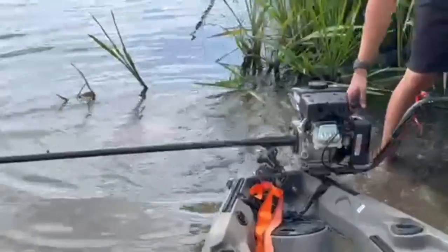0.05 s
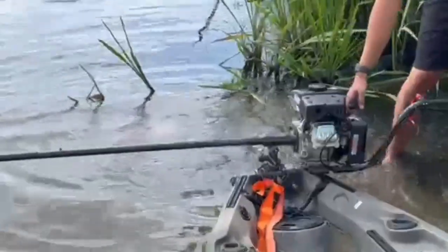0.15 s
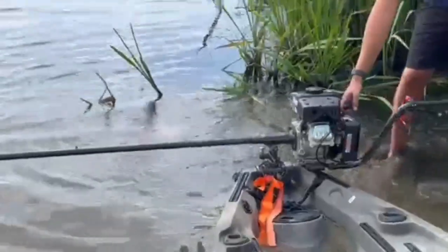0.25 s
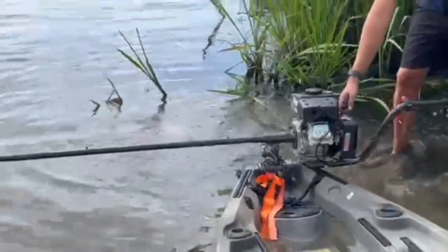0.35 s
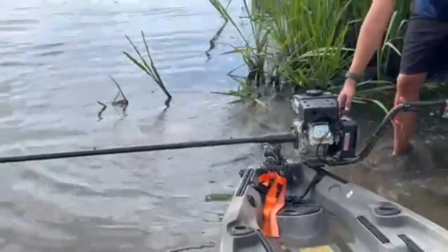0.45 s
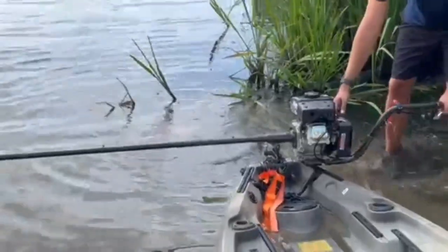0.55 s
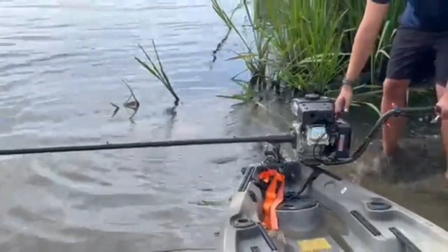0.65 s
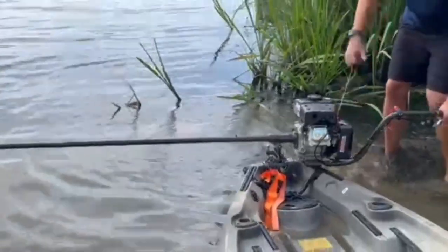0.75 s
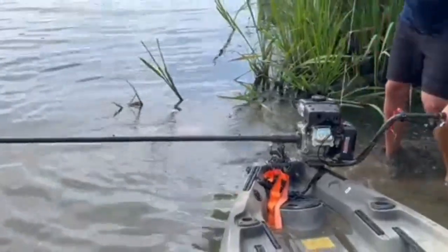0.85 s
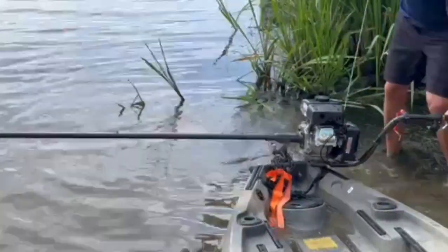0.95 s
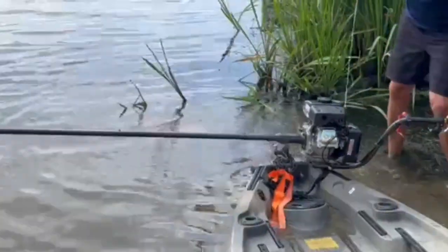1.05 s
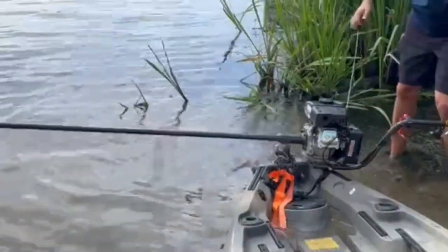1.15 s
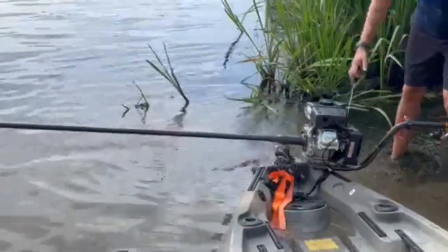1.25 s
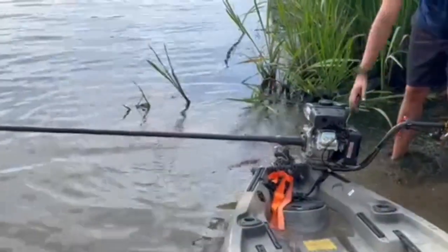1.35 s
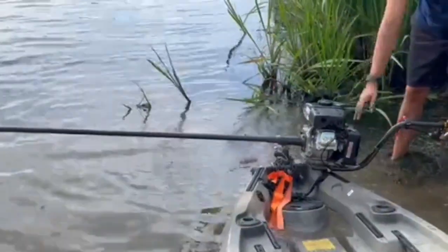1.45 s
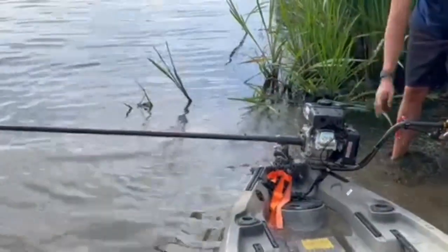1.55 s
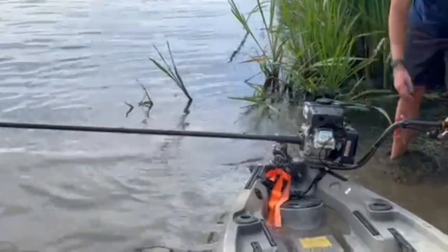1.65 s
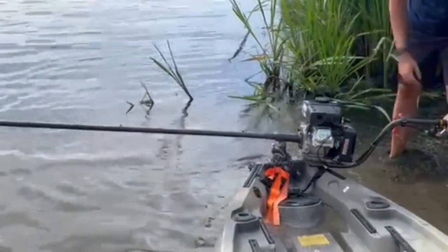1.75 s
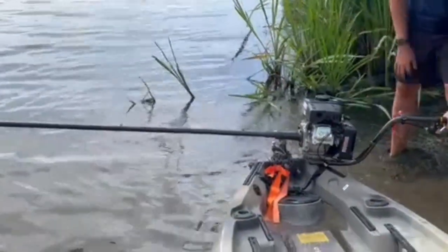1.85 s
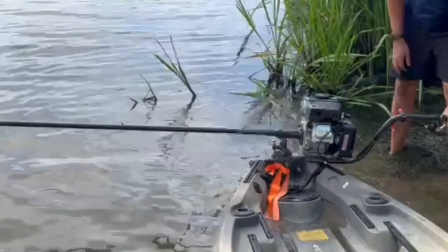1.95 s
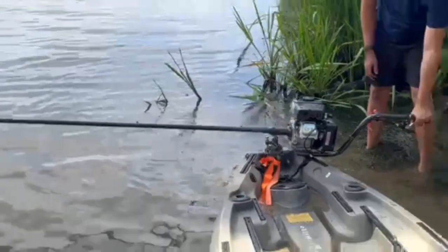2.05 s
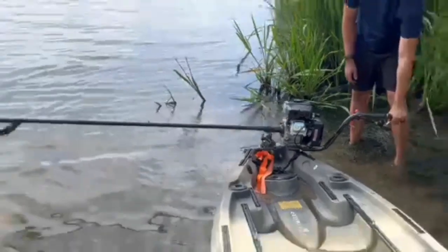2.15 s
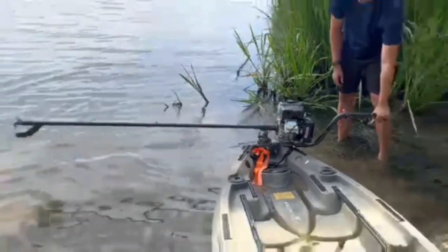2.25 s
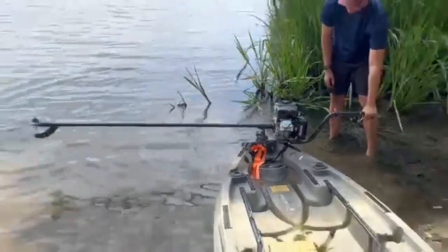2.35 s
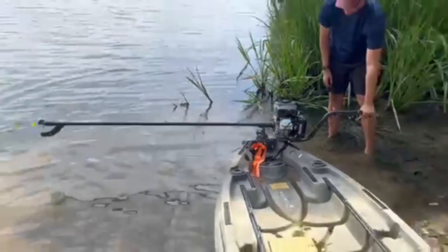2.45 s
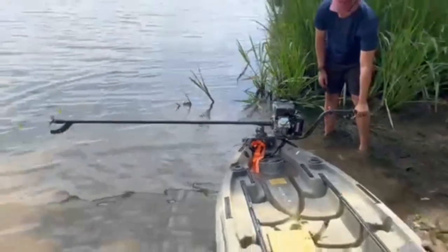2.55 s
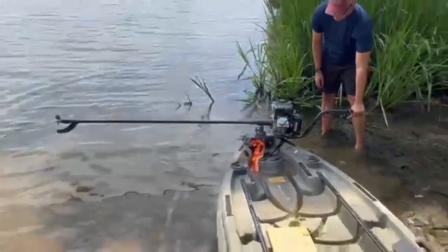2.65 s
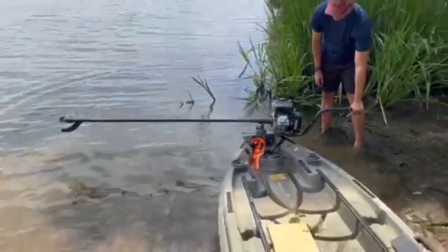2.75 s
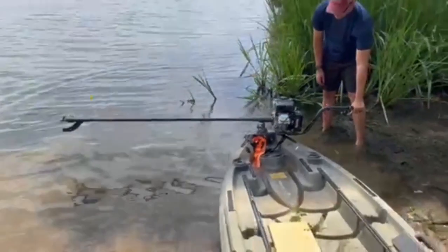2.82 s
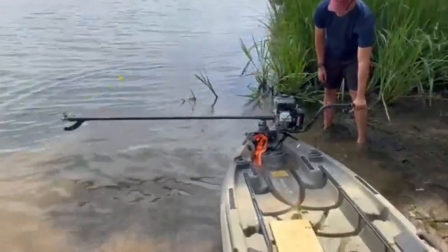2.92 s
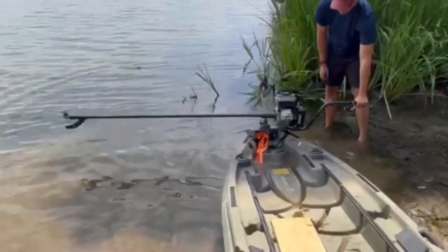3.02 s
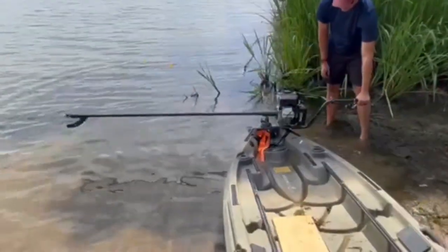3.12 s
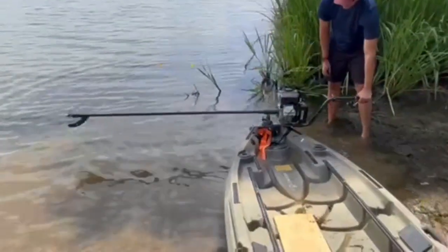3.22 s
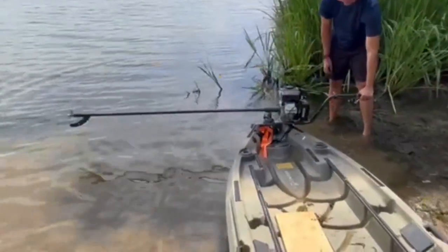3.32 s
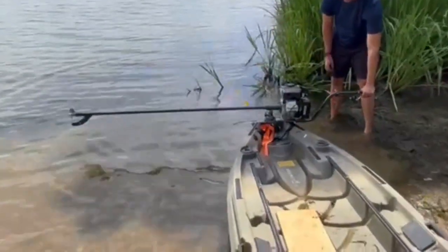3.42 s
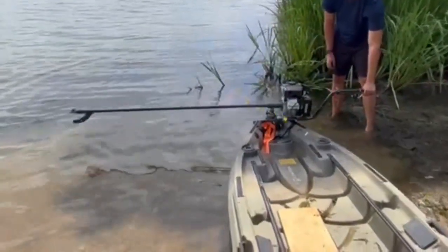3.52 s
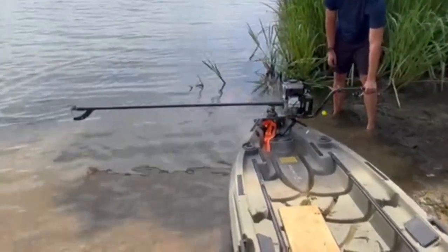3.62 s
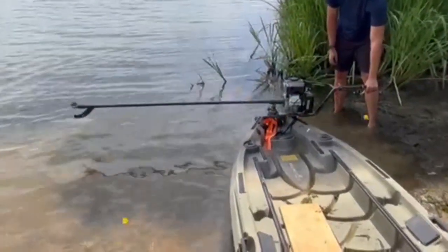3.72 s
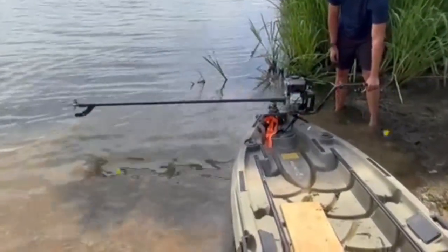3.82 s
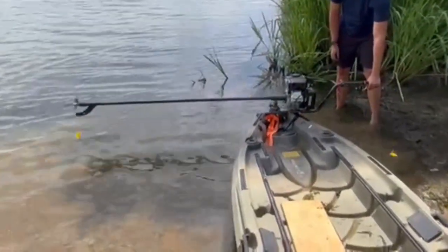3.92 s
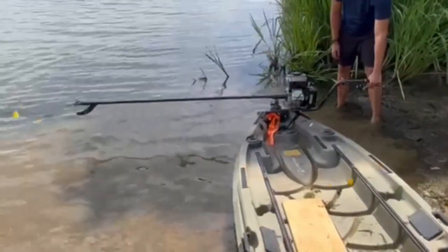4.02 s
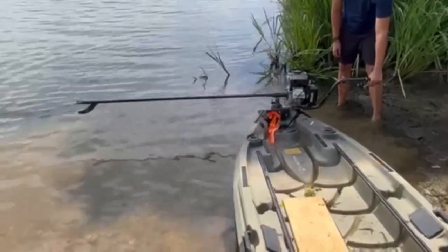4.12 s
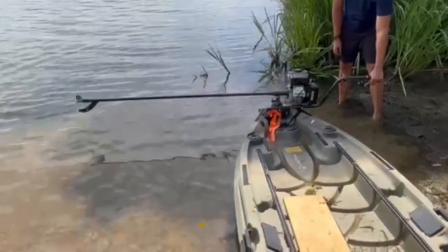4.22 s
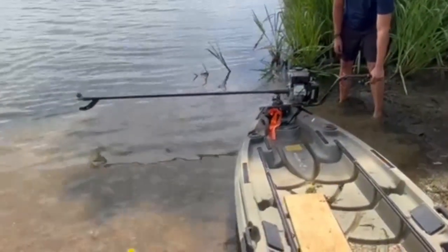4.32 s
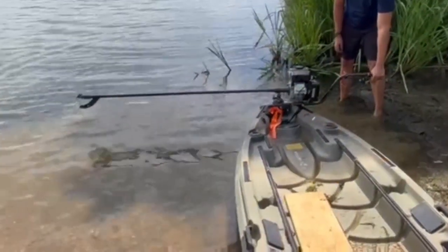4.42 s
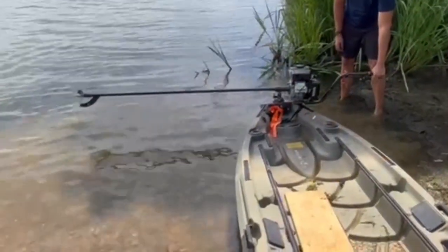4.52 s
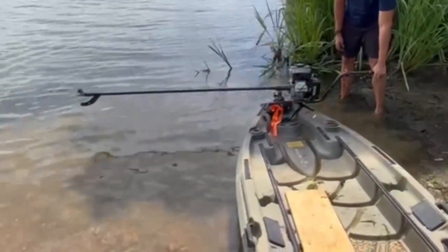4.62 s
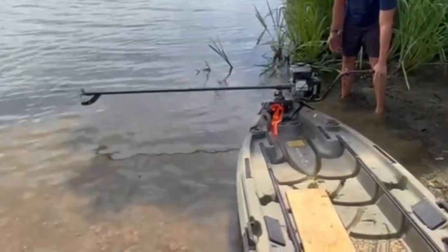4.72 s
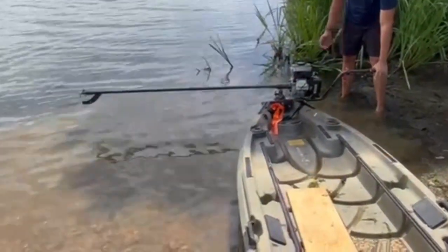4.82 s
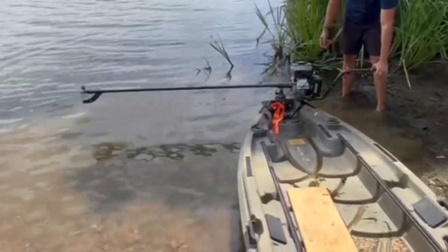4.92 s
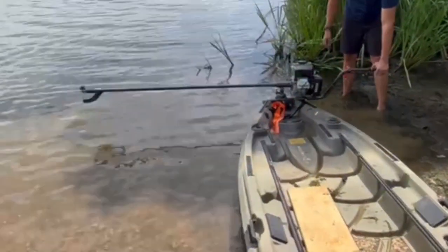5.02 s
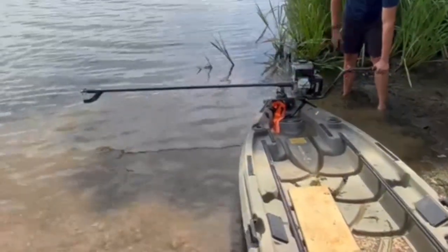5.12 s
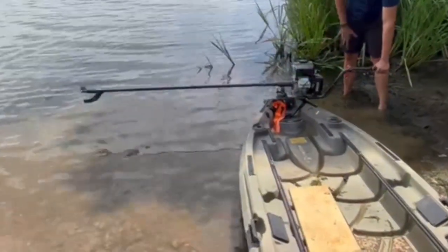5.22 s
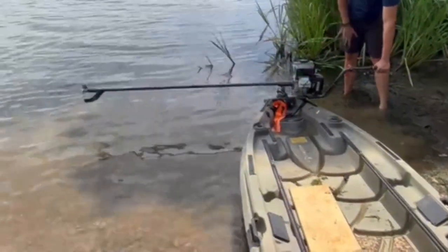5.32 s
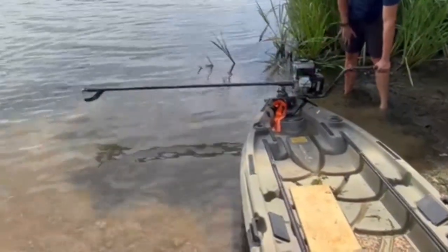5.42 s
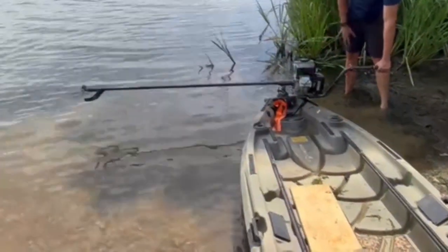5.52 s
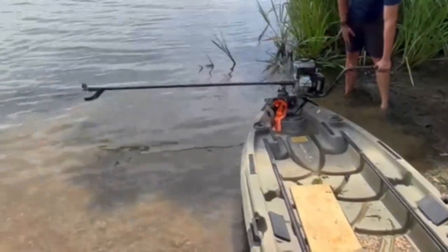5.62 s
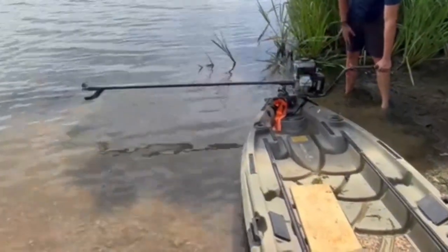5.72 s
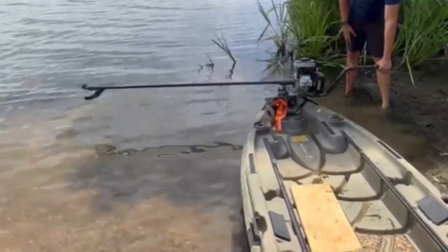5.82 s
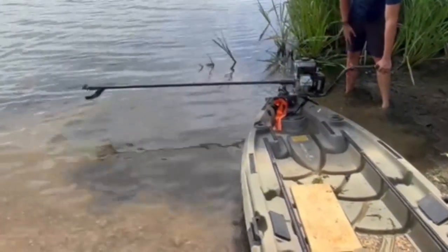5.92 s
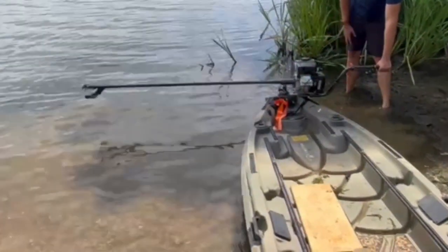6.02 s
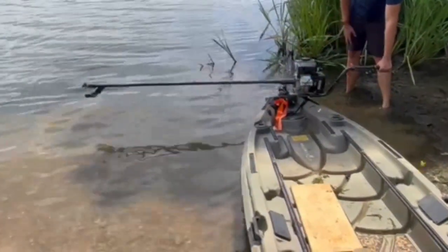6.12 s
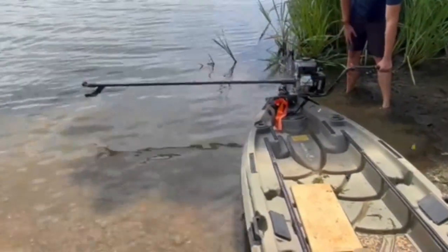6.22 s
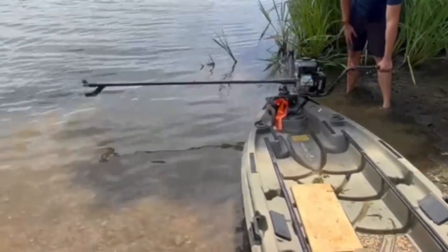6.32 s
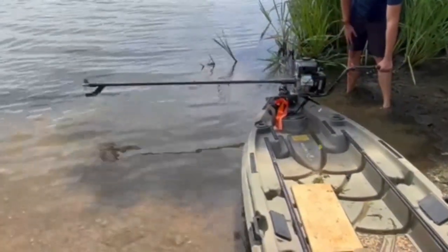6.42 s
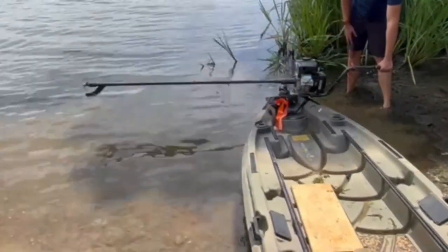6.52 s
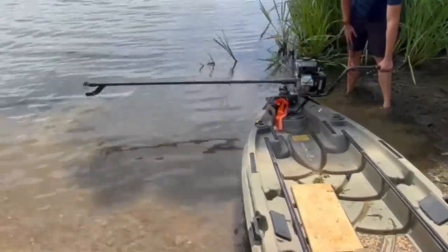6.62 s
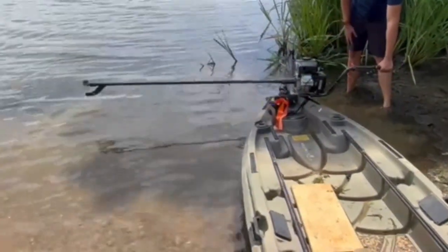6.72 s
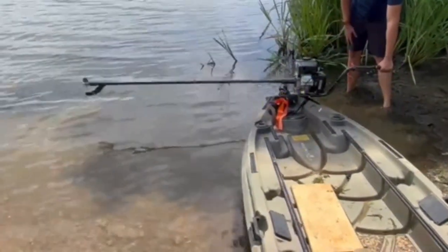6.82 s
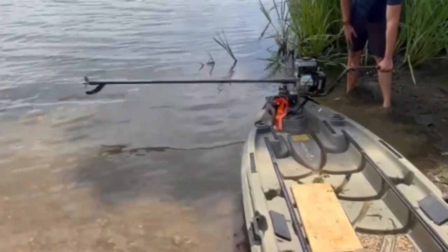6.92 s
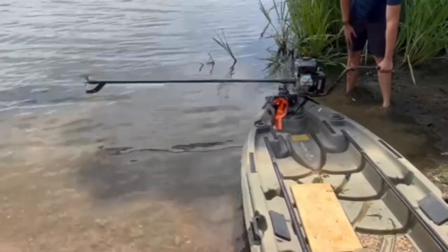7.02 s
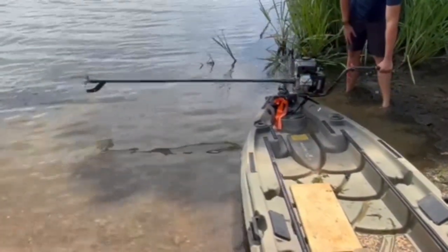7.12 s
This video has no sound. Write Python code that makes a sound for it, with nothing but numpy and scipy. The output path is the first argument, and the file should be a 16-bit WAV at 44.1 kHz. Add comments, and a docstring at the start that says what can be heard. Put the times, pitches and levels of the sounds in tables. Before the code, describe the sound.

Water laps quietly, a starter rope rasps, and a small single-cylinder engine barks up to a fast roar, then sinks to a thudding idle.

```python
"""Water laps at the bank and the starter handle ticks; then the rope rasps and a kayak's mud motor is
pull-started in the shallows. The single cylinder puffs, catches, barks up to speed, runs fast for two
seconds and sinks back to a thudding idle. Impulses and noise bursts timed by the engine cycle ring the
exhaust, block and hull; speed and throttle set their levels. Bubbles and filtered noise make the water.
A hand-held stereo microphone is a few metres away and draws back once the engine runs."""
import sys
import numpy as np
from scipy import signal
from scipy.fft import rfft, irfft, next_fast_len
from scipy.io import wavfile

SR = 44100
rng = np.random.default_rng(int(sys.argv[2]) if len(sys.argv) > 2 else 0)


def digitize_waveform(pressure):
    """Quantize a signal to 16-bit integers and store it at the path in sys.argv[1].

    Rows of a 2-D input are taken as channels; values are limited to [-1, 1].
    """
    field = np.atleast_2d(pressure).T
    bounded = np.clip(field, -1, 1)
    quanta = np.round(bounded * 32767).astype(np.int16)
    wavfile.write(sys.argv[1], SR, quanta)


N = 315756

# Water at the bank. Trickle: [t/s, level/dB]
TRICKLE = [(0, -56.5), (.15, -51), (.3, -56.5), (.45, -61.5), (.65, -57)]
# Small laps: [t/s, relative level/dB, starting pitch f/Hz, ring decay/s]
LAPS = [(0.076, -37, 1330, .006), (0.09, -28.5, 980, 0.0058), (0.103, -23.5, 1470, 0.0066),
        (0.126, -31, 1330, .007), (0.155, -37, 810, .02), (0.167, -40, 1140, 0.037),
        (0.181, -39, 730, 0.033), (.183, -32, 1500, .012), (0.26, -38, 1230, .008),
        (.283, -33, 1290, 0.0071), (0.517, -36, 1270, .005), (0.562, -39, 850, .008)]
# Spectrum of the hush along the shore: [f/Hz, relative level/dB]
SHORE = [(20, -7), (50, 14), (115, 4.5), (220, -2), (450, -10.5), (1100, -30), (3000, -30), (5500, -30),
         (8000, -22.5), (15800, -17.5)]

# Ticks of the starter as the handle is taken up and the pawls slip: [t/s, relative level/dB]
TICKS = [(0.052, -37), (0.12, -41), (.155, -38), (.299, -54), (.319, -45), (.412, -42), (.56, -43),
         (.892, -19), (.982, -10.5)]
# Spectrum of those ticks: [f/Hz, relative level/dB]
TICK_TONE = [(600, -15), (1700, -4.5), (4500, 0), (9000, -7), (15800, -16)]

# Pawls scraping in surges, each with a squeak:
# [t/s, held/s, level/dB, squeak f/Hz, squeak level re scrape/dB]
SCRAPES = [(0.679, 0.0095, -22, 1670, -5), (0.802, 0.017, -28, 1080, 2), (0.852, 0.039, -28.5, 1500, -13),
           (0.918, 0.026, -14.5, 8400, -16)]
SCRAPE_RISE_S, SCRAPE_TAIL = 0.0083, 1.42  # tail: decay time over held time
SQUEAK_WIDTH_HZ = 160
# Spectrum of rope and pawls: [f/Hz, relative level/dB]
STARTER = [(100, 7), (600, -4.5), (850, -1.5), (1150, 4), (1700, 8), (2600, -0.5), (4000, -4.5), (5200, -1),
           (7000, -10), (9500, -8), (12000, -16.5), (15800, -19)]
# Modes of the starter housing: [f/Hz, width/Hz, relative level/dB]
HOUSING = [(225, 25, -3.5), (486, 32, -9.5), (743, 27, -5.5)]
# Compression puffs while cranking: [t/s, relative level/dB]; the largest gives the peak level
PUFFS = [(.787, -18.5), (0.899, -9), (0.988, -7.5)]
PULL_FROM, TUG_AT, PULL_UNTIL = .642, .681, 1.0  # s: the rope starts to run, goes taut, is let go
ROPE_DB = -38.5
JOLT_DB, JOLT_RISE_S, JOLT_DECAY_S = -27.5, 0.0099, 0.046

# Engine speed: [t/s, firings per s]
SPEED = [(1.058, 14.98), (1.27, 23.036), (1.5, 36.403), (1.62, 39.291), (1.74, 38.533), (1.88, 36.157),
         (2.05, 37.624), (2.18, 36.961), (2.4, 36.66), (2.7, 36.79), (3.0, 36.588), (3.35, 37.459),
         (3.53, 35.07), (3.8, 31.323), (4.09, 27.028), (4.56, 22.304), (4.89, 19.447), (5.25, 18.259),
         (5.5, 18.348), (5.76, 16.979), (6.36, 18.101), (6.87, 17.982), (7.16, 17.168)]
FIRST_FIRING = 1.0583  # s
FAST_RATE = 37  # firings per s: the reference speed for the levels below
CATCH_AT, CATCH_LENGTH = .93, .1  # s: the engine fades in as it catches
BACK_FROM, BACK_LENGTH, NEAR_DB = 1.95, .5, 1.5  # s, s, dB: the microphone is carried back; louder before
FIRM_FROM, FIRM_LENGTH, FIRM_DB = 4.9, 1.3, 2.5  # s, s, dB: the idle slowly firms up
# Firings that stand out: [t/s, thump gain/dB, crack gain/dB]
UNEVEN = [(1.058, -6, -3.5), (1.119, 10.5, -3.5), (1.174, 10, -3), (1.223, -3, -0.5), (1.31, 5, -1),
          (1.475, -1, 0), (1.503, -15, -4), (1.61, 3, 2.5), (1.82, -9, 8), (1.928, 0.5, -0.5),
          (1.954, 4.5, -3.5), (1.981, 2, -2), (2.035, 4.5, -1), (2.061, 2, 2), (3.53, 0, 5),
          (3.832, 1, -11), (4.04, -2.5, 0), (4.305, 2.5, -2), (4.51, -6, 0), (4.65, -7, 0), (4.79, -7, 0)]

# Throttle: [opens t/s, shuts t/s, opening re wide open/dB, starting rasp level/dB]
THROTTLE = [(0.946, 1.571, 0.5, -26.5), (1.907, 1.997, -1.5, -30), (2.2, 2.543, -21, -29),
            (2.568, 3.4, -19, -27)]
OPEN_S, SHUT_S = 0.049, 0.043  # travel time, decay time
RASP_SAG_DB_PER_S = 7.5  # the rasp loses level from the moment the throttle opens

# Level of each part:
# [level at the reference speed/dB, dB per doubling of speed, dB added per unit of throttle opening]
THUD_LEVEL = (-21.5, 8.8, -8)
HISS_LEVEL = (-58.5, -1.5, 0)
CLATTER_LEVEL = (-27.5, 6.36, 1)
COVER_LEVEL = (-36.5, 5, 0.67)
VALVE_LEVEL = (-39, 6.85, 3.1)
HULL_LEVEL = (-32.5, 3.6, 14)
HUM_DB, HUM_OPEN_DB = -31, 6  # at the reference speed; added per unit of throttle opening

# Spectrum of air roaring through the carburettor: [f/Hz, relative level/dB]
ROAR = [(300, -34), (700, -9.5), (950, 15), (1400, 10), (1750, 1), (2200, -12), (2900, -1), (4000, -4),
        (5500, -3), (7000, -23), (12000, -18)]
ROAR_DB, ROAR_OPEN_DB, ROAR_DB_PER_OCTAVE = -30.5, 4, 2.5

# Blows of the mechanism in every cycle: [share of the cycle after firing, relative level/dB]
KNOCKS = [(-.14, 3), (-.07, 1.5), (.10, 5), (.25, 1), (.31, -0.5), (.42, -4.5), (.52, 3), (.74, -0.5)]
# Modes of the engine block: [f/Hz, width/Hz, relative level/dB]
BLOCK = [(730, 220, -18.5), (1119, 86, 3), (1310, 93, -0.5), (1620, 170, -12.5)]
# Spectrum of the casing: [f/Hz, relative level/dB]
CASING = [(150, -34), (450, -4.5), (700, -14.5), (1000, -10.5), (1500, -12), (2000, -14.5), (3400, -35),
          (9000, -59)]
# Modes of the tin covers over valves and fan: [f/Hz, width/Hz, relative level/dB]
COVERS = [(1705, 41, 2.5), (2011, 27, 2), (2298, 122, 0), (2542, 24, 3.5), (2660, 30, 3), (3075, 66, -2),
          (3235, 38, 5.5), (3336, 20, 7)]
# Spectrum of the valve gear: [f/Hz, relative level/dB]
VALVES = [(1500, -10.5), (3000, 7), (3700, 3), (4500, 8), (5400, 8.5), (6000, 2.5), (6700, -17),
          (7150, 10.5), (7800, 4.5), (8500, 2.5), (10500, -2.5), (15800, -49)]

# Modes of the silencer can and tailpipe: [f/Hz, width/Hz, relative level/dB]
PIPE = [(538, 61, -3), (730, 95, -8), (807, 6.2, 5.5), (883, 36, 7), (980, 60, 2.5), (1165, 33, 6.5),
        (1277, 20, 7), (1606, 24, 5), (2200, 60, -2)]
# Spectrum of the muffler's thud: [f/Hz, relative level/dB]
MUFFLER = [(20, -51), (60, -29), (100, 2.5), (160, -2.5), (220, 6.5), (330, 6), (420, 2.5), (475, -24.5),
           (650, -49), (950, -6.5), (1500, -21.5), (4000, -69)]
# Spectrum of the exhaust jet: [f/Hz, relative level/dB]
RASP = [(400, -36), (900, 2), (1600, 0), (2000, -1), (2550, 1.5), (3000, -13), (3700, -30), (6000, -19),
        (16000, -28)]
# Intake gulp after the exhaust; its lag is a time plus a share of the cycle
GULP_DB, GULP_LAG_S, GULP_SHARE, GULP_TOP_HZ = -8, 0.00582, 0.187, 300
# Modes of the plastic hull: [f/Hz, width/Hz, relative level/dB]
HULL = [(75, 40.7, 7), (102.9, 21, 12.5), (154.6, 70, 4.5)]
PATH_TOP_HZ = 2200  # soft and air-filled bodies pass little above this

# Spectrum of the crack as the valve lifts under load: [f/Hz, relative level/dB]
BLAST = [(60, -25), (200, 5), (450, 9), (680, -6), (1000, 5.5), (1500, 8.5), (2200, -2), (2550, 1),
         (3000, 0.5), (4000, -5.5), (5000, -2.5), (6300, 3), (8300, -6), (9200, -10.5), (15800, -15)]
# Spectrum of the slug of gas that follows: [f/Hz, relative level/dB]
SLUG = [(30, -27), (75, 0), (130, 12), (220, 0.5), (350, 4), (500, -3.5), (700, -27), (3000, -54)]
SLUG_DB, SLUG_LAG_S = -1, 0.00023
BARK_DB, BARK_DB_PER_OCTAVE = -21.5, 0.5
LEAK_DB, LEAK_DB_PER_OCTAVE = -24.5, 35  # share of the bark that does not need the throttle

# Coasting with the throttle shut while the exhaust booms: [from t/s, until t/s,
# boom level at the reference speed/dB, multiple of the firing rate, extra crank hum/dB]
COASTS = [(1.628, 1.814, -26, 4, 8), (2.084, 2.17, -27, 4, 8), (3.531, 3.93, -29.5, 3, 2),
          (3.97, 4.407, -37, 4, 10.5)]
COAST_FADE_S, COAST_THUD_DB, COAST_DB_PER_OCTAVE = 0.021, -7, 3
# Spectrum of uneven gas flow while coasting: [f/Hz, relative level/dB]
SPUTTER = [(30, -15), (70, -6.5), (105, 4.5), (170, -12.5), (270, -2), (400, -10), (600, -14), (3000, -72)]
SPUTTER_DB, BOOM_WAVER = 0.5, 0.32  # level re boom; rms share of the boom's gain that wavers

# Sound scattered by water and reeds: [f/Hz, level re direct sound/dB]
SCATTER = [(100, -23), (400, -23), (1000, -13), (2500, -9), (4500, -7), (7500, -9), (9000, -11)]
# Microphone pair, phase by which left leads right: [f/Hz, phase/rad]
LEAD = [(200, -.05), (1000, -.35), (1300, -.35), (1640, -1.5), (2550, -.3), (3300, .3), (4500, .6),
        (5300, 1.3), (6500, 2.9), (7100, 1.6), (8300, 0), (10300, 0), (11700, -2.9), (13700, -3),
        (14700, 0)]
# Microphone pair, left minus right: [f/Hz, level/dB]
TILT = [(300, -1.4), (800, -2.5), (1080, -6), (1400, -1), (1750, -4), (2200, .8), (2700, 0), (3200, -3.5),
        (4500, 0), (5500, 2), (7500, -2.5), (8400, 0)]
TOP_HZ = 15900  # upper band limit


def amp(db):
    """Decibels to gain."""
    return 10 ** (np.asarray(db) / 20)


def unit(x):
    """Scale to rms 1."""
    return x / np.sqrt(np.mean(x ** 2) + 1e-20)


def clock():
    """Time of each sample in seconds."""
    return np.arange(N) / SR


def curves(rows):
    """One value per sample for each column after the time."""
    s, *cols = np.transpose(rows)
    return [np.interp(clock(), s, c) for c in cols]


def along(points, hz):
    """Interpolate (Hz, value) points on a log frequency axis."""
    f, v = np.transpose(points)
    return np.interp(np.log(hz + 1), np.log(f + 1), v)


def ramp(start, length):
    """Rises from 0 to 1 over the given time."""
    return np.clip((clock() - start) / max(length, 1e-4), 0, 1)


def gate(start, end, attack, release):
    """Straight attack from the start, hold until the end, exponential release."""
    return ramp(start, attack) * np.exp(-np.maximum(clock() - end, 0) / release)


def filtered(x, response):
    """Pass x through a complex response of frequency."""
    m = 2 * next_fast_len(N // 2 + SR // 4)  # padded, so that tails do not wrap round
    return irfft(rfft(x, m) * response(np.fft.rfftfreq(m, 1 / SR)), m)[..., :N]


def colour(points):
    """Causal (minimum-phase) response with the given spectrum."""
    def response(hz):
        cepstrum = irfft(np.log(amp(along(points, hz))))
        half = len(cepstrum) // 2
        cepstrum[1:half] *= 2
        cepstrum[half + 1:] = 0
        return np.exp(rfft(cepstrum))
    return response


def resonances(modes):
    """Causal response of (Hz, width, dB) modes, alternating in sign."""
    def response(f):
        return sum((-1) ** k * amp(db) * 1j * f * width / (centre ** 2 - f * f + 1j * f * width)
                   for k, (centre, width, db) in enumerate(modes))
    return response


def muffled(modes):
    """Modes of a soft or air-filled body, which dulls any click."""
    return lambda hz: resonances(modes)(hz) / (1 + 1j * hz / PATH_TOP_HZ) ** 3


def noise():
    """Fresh white noise."""
    return rng.standard_normal(N)


def ringing(decay):
    """A dense random ring of energy 1: the many small modes of a metal part."""
    t = np.arange(SR // 16) / SR
    ring = rng.standard_normal(len(t)) * np.exp(-t / decay)
    return ring / np.linalg.norm(ring)


def kicks(times, sizes):
    """Single-sample impulses."""
    samples = np.clip(np.round(times * SR).astype(int), 0, N)
    return np.bincount(samples, sizes, N + 1)[:N]


def strokes(times, scatter_db):
    """One impulse a cycle, of uneven size, with mean power about 1 at any speed."""
    even = np.sqrt(np.abs(np.gradient(times)) * SR)
    return kicks(times, even * amp(scatter_db * rng.standard_normal(len(times))))


def bursts(times, rise, decay, scatter_db):
    """Noise of mean power about 1 that swells and dies away after each time."""
    t = np.arange(SR // 8) / SR
    shape = ((1 - np.exp(-t / rise)) * np.exp(-t / decay)) ** 2
    power = signal.fftconvolve(strokes(times, scatter_db) ** 2, shape / shape.sum())[:N]
    return np.sqrt(np.abs(power)) * noise()


def water():
    """Small laps, each a bubble of rising pitch and a little splash, over a trickle and the shore's hush."""
    laps, t = np.zeros(N), np.arange(SR // 10) / SR
    for s, db, hz, ring_s in LAPS:
        bubble = np.sin(2 * np.pi * hz * t * (1 + .015 * t / ring_s)) * np.exp(-t / ring_s)
        splash = np.diff(rng.standard_normal(len(t) + 1)) * np.exp(-t / 0.004)
        onset = 1 - np.exp(-t / 0.00093)
        laps[round(s * SR):][:len(t)] += amp(db - 7.0) * (bubble + amp(-16) * splash) * onset
    drops = rng.standard_normal(N) * (rng.random(N) < 2000 / SR)  # about 2000 a second
    drop_modes = resonances([(890, 360, -2.5), (1600, 480, 2.0), (3420, 4400, -13.5)])
    trickle = amp(curves(TRICKLE)[0]) * unit(filtered(drops, drop_modes))
    shore = amp(-45.5) * unit(filtered(noise(), colour(SHORE)))
    return laps + trickle + shore


def handle():
    """Dry ticks of the starter handle and its pawls: impulses with a short metal ring."""
    s, db = np.transpose(TICKS)
    rings = signal.fftconvolve(kicks(s, amp(db)), ringing(decay=0.0033))[:N]
    ticks = filtered(rings, colour(TICK_TONE))
    return ticks / np.abs(ticks).max() * amp(db.max())


def starter():
    """The tug jolts the housing; rope and pawls scrape in fine ticks; the piston puffs through the muffler."""
    grit = rng.standard_normal(N) * (rng.random(N) < 900 / SR)  # about 900 ticks a second
    scrape = unit(filtered(noise() + amp(-8.0) * unit(grit), colour(STARTER)))
    rope = amp(ROPE_DB) * gate(PULL_FROM, PULL_UNTIL, attack=0.02, release=0.021) * scrape
    pawls = np.zeros(N)
    for s, held, db, hz, squeak_db in SCRAPES:
        surge = amp(db) * gate(s, s + held, SCRAPE_RISE_S, SCRAPE_TAIL * held)
        squeak = unit(filtered(noise(), resonances([(hz, SQUEAK_WIDTH_HZ, 0)])))
        pawls += surge * (scrape + amp(squeak_db) * squeak)
    shake = gate(TUG_AT, TUG_AT + JOLT_RISE_S, JOLT_RISE_S, JOLT_DECAY_S)
    jolt = amp(JOLT_DB) * shake * unit(filtered(noise(), resonances(HOUSING)))
    s, db = np.transpose(PUFFS)
    compressions = kicks(s - .003, amp(db))
    puffs = filtered(compressions, colour(MUFFLER)) + amp(-1.0) * filtered(compressions, resonances(HULL))
    return rope + pawls + jolt + puffs / np.abs(puffs).max() * amp(db.max())


def cycles():
    """Four-stroke cycles counted from the first firing."""
    turned = np.cumsum(curves(SPEED)[0]) / SR
    return turned - np.interp(FIRST_FIRING, clock(), turned)


def firings(jitter):
    """Time and length of each cycle; slow cycles are the least even."""
    turned = cycles()
    times = np.interp(np.arange(int(turned[-1]) + 1), turned, clock())
    period = np.gradient(times)
    return times + jitter * (period / period.max()) ** 2 * rng.standard_normal(len(times)), period


def octaves():
    """Engine speed in doublings above the reference speed."""
    return np.log2(curves(SPEED)[0] / FAST_RATE)


def relative_flow():
    """Gas flow, taken as engine speed over its highest value."""
    return curves(SPEED)[0] / np.max(np.array(SPEED)[:, 1])


def throttle():
    """Opening of the throttle (about 1 is wide open), and the gain of the rasp each opening brings."""
    opening, rasp = np.zeros(N), np.zeros(N)
    for opens, shuts, opening_db, rasp_db in THROTTLE:
        held = gate(opens, shuts, OPEN_S, SHUT_S)
        opening += held * amp(opening_db)
        rasp += held * amp(rasp_db - RASP_SAG_DB_PER_S * np.maximum(clock() - opens, 0))
    return opening, rasp


def intake(times, period, opening):
    """Air sucked in between firings: a ragged roar that fades as the microphone draws back."""
    suck = bursts(times + .25 * period, rise=.002, decay=.008, scatter_db=2) + .6 * noise()
    close = 1 - ramp(BACK_FROM + BACK_LENGTH / 2, BACK_LENGTH / 2)
    gain = amp(ROAR_DB + ROAR_OPEN_DB * opening + ROAR_DB_PER_OCTAVE * octaves())
    return close * gain * unit(filtered(suck, colour(ROAR)))


def knocks(times, period):
    """Piston, cam and pushrods strike at set points of the cycle, each with a short ring and a little play."""
    blows = np.zeros(N)
    for share, db in KNOCKS:
        play = .002 * rng.standard_normal(len(times))
        hits = strokes(times + (share + play) * period, scatter_db=1.4)
        blows += amp(db) * signal.oaconvolve(hits, ringing(decay=0.0077))[:N]
    return unit(blows)


def block(times, period, clatter_gain, cover_gain, valve_gain):
    """Blows ring the block; after each firing the valve gear clacks and rattles the covers; the fan hisses."""
    repeated = knocks(times, period)
    slack = np.clip(1.3 - curves(SPEED)[0] / 40, 0, 1)  # loose parts stand out at low speed
    clack = slack * bursts(times + .18 * period, rise=.003, decay=.011, scatter_db=1.2)
    blows = repeated + amp(-7) * clack + amp(-5) * noise()
    clatter = unit(filtered(blows, resonances(BLOCK)) + filtered(blows, colour(CASING)))
    rattle = unit(filtered(.8 * clack + .7 * repeated + .35 * noise(), muffled(COVERS)))
    tappet = bursts(times + .185 * period, rise=.0012, decay=.012, scatter_db=1.5)
    # the steel rocker arm rings high
    rocker = unit(filtered(tappet, resonances([(4200, 19000, 0.5), (7650, 1200, 9.8)])))
    ticks = amp(-3.0) * slack * rocker + noise()
    steel = ticks + .55 * signal.fftconvolve(ticks, ringing(decay=.005))[:N]
    valves = unit(filtered(steel, colour(VALVES)))
    return clatter_gain * clatter + cover_gain * rattle + valve_gain * valves


def exhaust(times, period, thud_gain, rasp_gain):
    """Gas hisses past the valve, the pipe rings, the muffler thuds briefly; then the intake gulps."""
    flow = relative_flow()
    gas = amp(-11) * bursts(times - .004, rise=.001, decay=.02, scatter_db=1)
    gulp = amp(GULP_DB) * strokes(times + GULP_LAG_S + GULP_SHARE * period, scatter_db=1)
    dull_gulp = filtered(gulp, lambda hz: 1 / (1 + (hz / GULP_TOP_HZ) ** 4))
    puffs = strokes(times + 0.00056, scatter_db=-0.53) + gas + dull_gulp
    # the quarter-turn of phase makes each puff swing down, then up
    thud = unit(filtered(puffs, lambda hz: -1j * amp(along(MUFFLER, hz))))
    pipe_gas = amp(-9) * bursts(times - .005, rise=.001, decay=.012, scatter_db=1)
    pipe = strokes(times - .003, scatter_db=1) + pipe_gas
    drone = amp(-5.0) * flow ** 3.4 * unit(filtered(pipe, muffled(PIPE)))
    # the pulsed jet gives way to a steadier hiss at idle
    pulses = bursts(times - .0045, rise=.0015, decay=.0045, scatter_db=.8)
    jet = flow * pulses + (1.42 - flow) * noise()
    rasp = unit(filtered(jet, colour(RASP)))
    return thud_gain * (thud + drone) + rasp_gain * rasp


def hull(times, boom_gain, hum_gain):
    """Firings rock the hull, loosely at idle; the unbalanced crank hums twice a cycle and grows with speed."""
    speed, = curves(SPEED)
    shudder = np.clip(.9 - speed / 45, 0, 1) * noise()
    boom = unit(filtered(strokes(times + .002, scatter_db=.8) + shudder, muffled(HULL)))
    hum = np.sin(2 * np.pi * (2 * cycles() + 0.31)) * (speed / FAST_RATE) ** 2.1
    return boom_gain * boom + hum_gain * hum


def bark(times, period, crack_gain, slug_gain):
    """Under load the lifting valve lets out a ragged crack, and a heavy slug of gas follows it."""
    lift = times - .002 - 0.125 * period  # the valve lifts earlier when the crank is slow
    shock = signal.fftconvolve(strokes(lift + .002, scatter_db=1.5), ringing(decay=.0048))[:N]
    crack = .45 * shock + .9 * bursts(lift + .0005, rise=.0024, decay=.0034, scatter_db=1)
    ragged = amp(-3.5) * bursts(times, rise=.002, decay=.02, scatter_db=2)
    gas = strokes(times + SLUG_LAG_S, scatter_db=1) + ragged
    slug = amp(SLUG_DB) * relative_flow() * unit(filtered(gas, colour(SLUG)))
    return crack_gain * unit(filtered(crack, colour(BLAST))) - slug_gain * slug


def unevenness():
    """Gain of the thump and of the crack, held through each cycle that stands out."""
    cycle = np.floor(cycles() + .3)
    thump_db, crack_db = sum(np.outer(dbs, cycle == cycle[round(s * SR)]) for s, *dbs in UNEVEN)
    return amp(thump_db), amp(crack_db)


def coasting(times):
    """How far the engine coasts (about 0-1), the extra hum (dB), and a boom on a multiple of the firing rate."""
    coast, hum_db, boom = np.zeros((3, N))
    gas = strokes(times, scatter_db=2) + noise()
    sputter = amp(SPUTTER_DB) * unit(filtered(gas, colour(SPUTTER)))
    waver = 1 + BOOM_WAVER * unit(filtered(noise(), lambda hz: hz < 14))
    for start, end, db, multiple, extra_db in COASTS:
        spell = gate(start, end, COAST_FADE_S, COAST_FADE_S)
        tone = np.sqrt(2) * waver * np.sin(2 * np.pi * round(multiple) * cycles())
        coast += spell
        hum_db += spell * extra_db
        boom += spell * amp(db) * (tone + sputter)
    return coast, hum_db, boom * amp(COAST_DB_PER_OCTAVE * octaves())


def engine():
    """Speed and throttle set the level of every part; the engine fades in as it catches."""
    times, period = firings(jitter=0.0005)  # s, at the slowest cycle
    opening, rasp = throttle()
    coast, hum_db, boom = coasting(times)
    pace = octaves()
    thump, crack = unevenness()

    def level(law):
        return amp(law[0] + law[1] * pace + law[2] * opening)

    # coasting softens the thud most at high speed
    thud = thump * level(THUD_LEVEL) * amp(COAST_THUD_DB * coast * 4 ** pace)
    leak = amp(LEAK_DB + LEAK_DB_PER_OCTAVE * pace)
    load = amp(BARK_DB + BARK_DB_PER_OCTAVE * pace) * (opening + leak)
    hum = amp(HUM_DB + HUM_OPEN_DB * opening + hum_db)
    parts = intake(times, period, opening)
    parts += block(times, period, level(CLATTER_LEVEL), level(COVER_LEVEL), level(VALVE_LEVEL))
    parts += exhaust(times, period, thud, np.hypot(level(HISS_LEVEL), rasp))
    parts += hull(times, level(HULL_LEVEL) * amp(COAST_THUD_DB * coast), hum)
    parts += bark(times, period, load * crack, load * thump) + boom
    drift_db = FIRM_DB * ramp(FIRM_FROM, FIRM_LENGTH) + NEAR_DB * (1 - ramp(BACK_FROM, BACK_LENGTH))
    return ramp(CATCH_AT, CATCH_LENGTH) * amp(drift_db) * parts


def scatter(sound):
    """Short echoes from rippling water and swaying reeds, whose phase keeps drifting."""
    echo = signal.fftconvolve(sound, ringing(decay=0.0075))[:N]
    drift = np.cumsum(noise()) * np.sqrt(150 / SR)  # random walk in radians
    moving = signal.hilbert(echo, next_fast_len(N))[:N] * np.exp(1j * drift)
    return filtered(moving.real, lambda hz: amp(along(SCATTER, hz)))


def scene():
    """The sounds reach both microphones, each with its own scatter, level and phase."""
    sound = water() + handle() + starter() + engine()
    pair = sound + np.array([scatter(sound), scatter(sound)])
    sides = np.array([[.5], [-.5]])  # left, right
    return filtered(pair, lambda hz: amp(sides * along(TILT, hz)) * np.exp(1j * sides * along(LEAD, hz)))


def record(dry):
    """A rumble filter thins the deepest bass, peaks round off near full scale, the band limit cuts the top."""
    rumble_hz = 55
    lean = filtered(dry, lambda hz: (hz / np.hypot(hz, rumble_hz / np.sqrt(2))) ** 4)
    rounded = lean / (1 + np.abs(lean / .95) ** 6) ** (1 / 6)
    return filtered(rounded, lambda hz: hz < TOP_HZ)


dry = scene()
out = record(dry)
digitize_waveform(out)
```